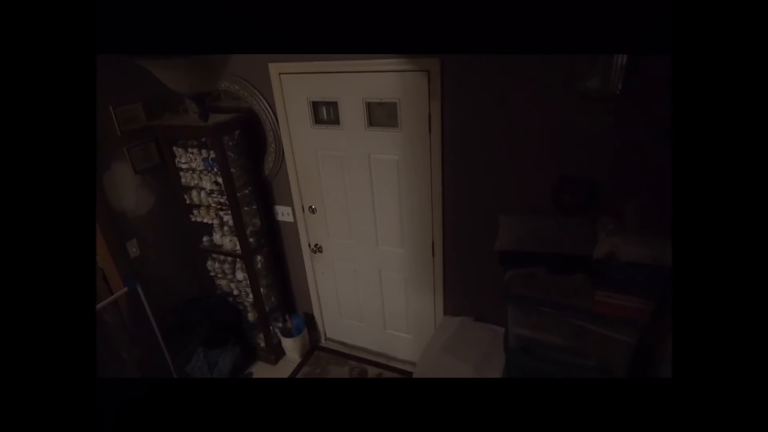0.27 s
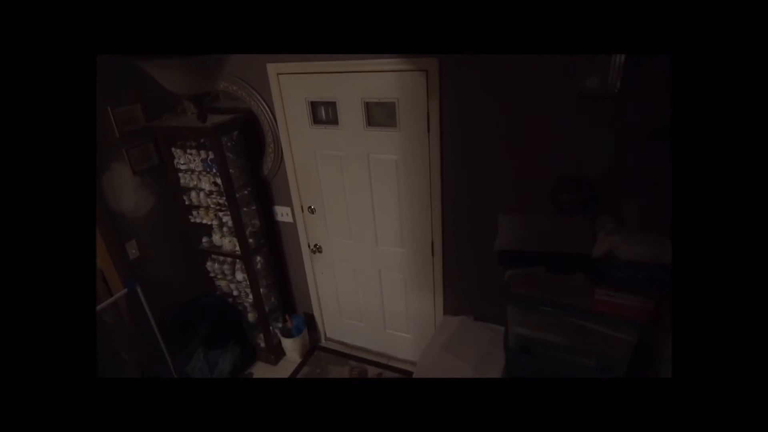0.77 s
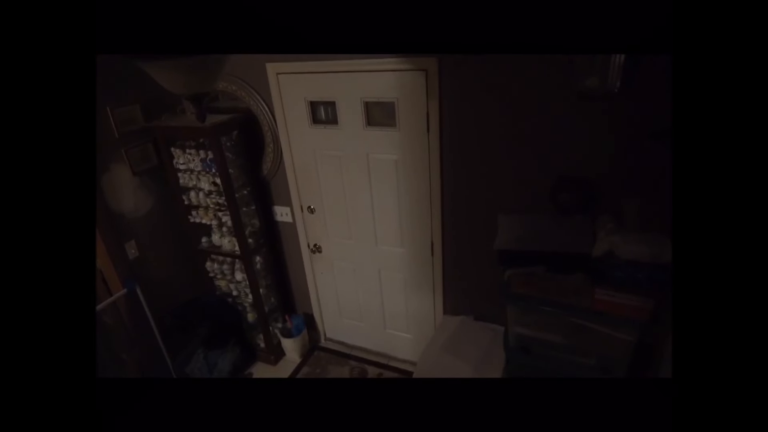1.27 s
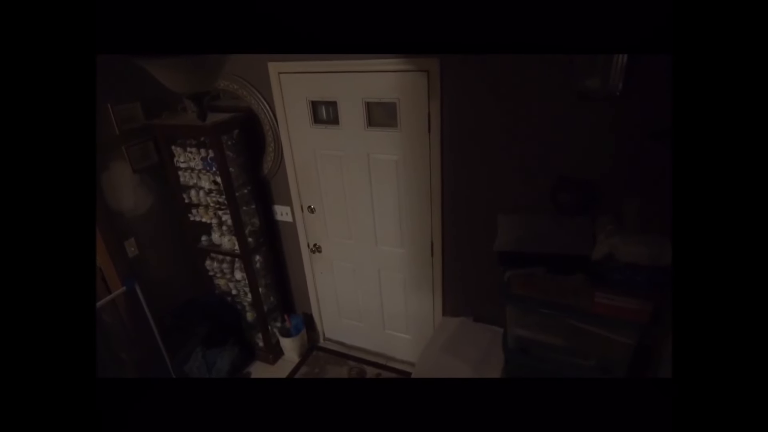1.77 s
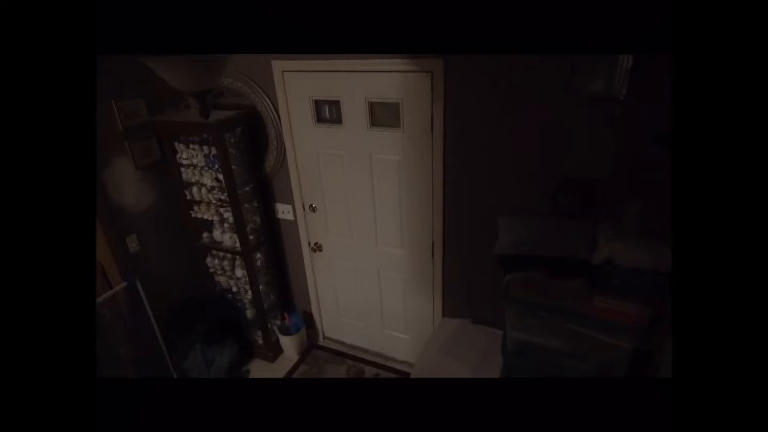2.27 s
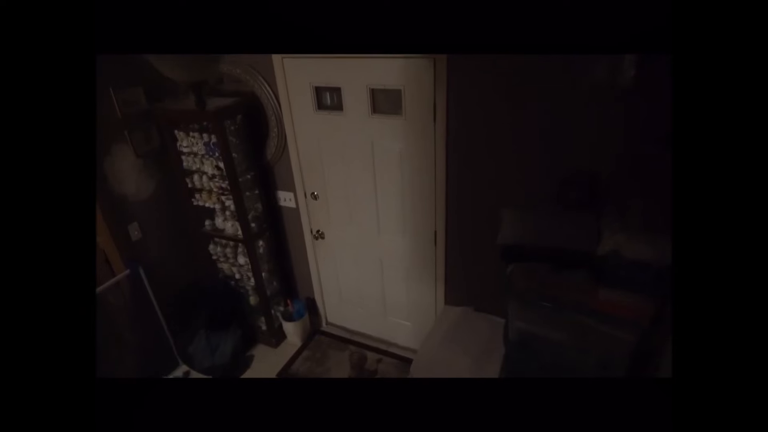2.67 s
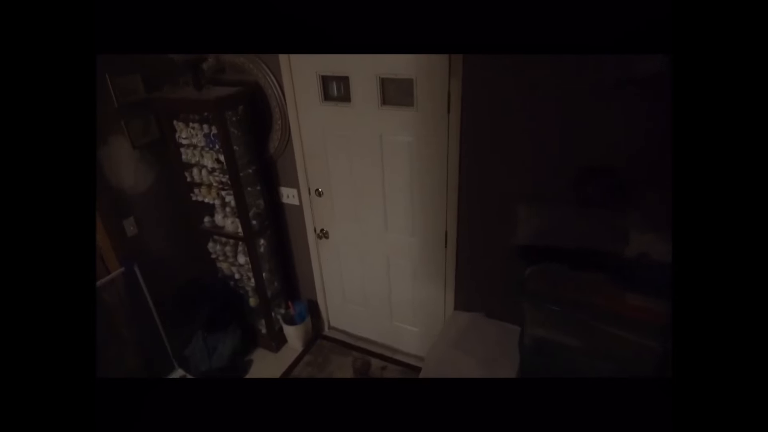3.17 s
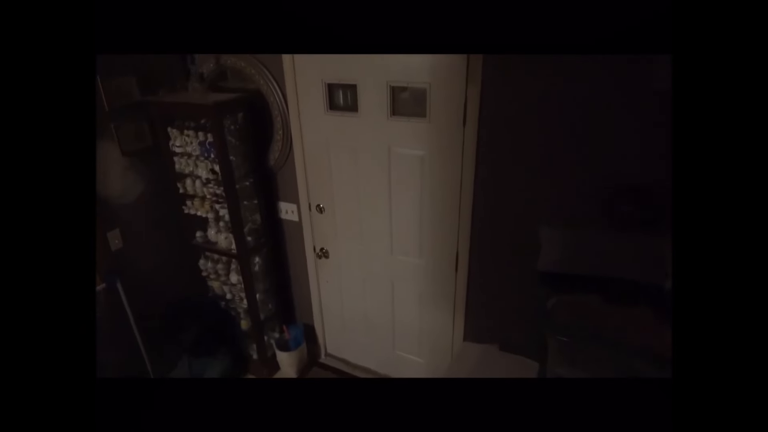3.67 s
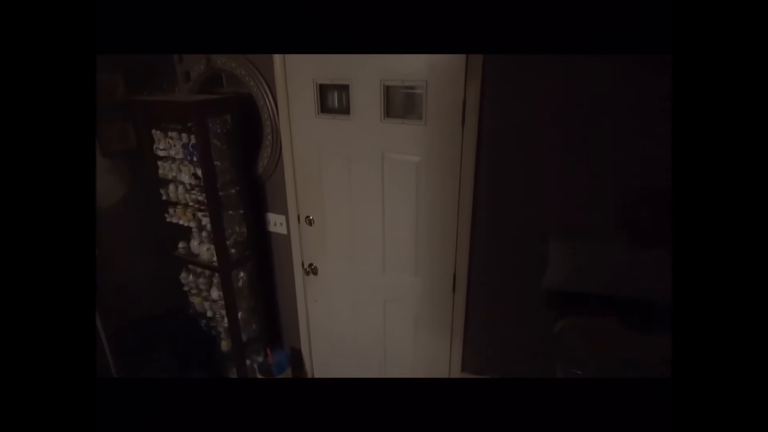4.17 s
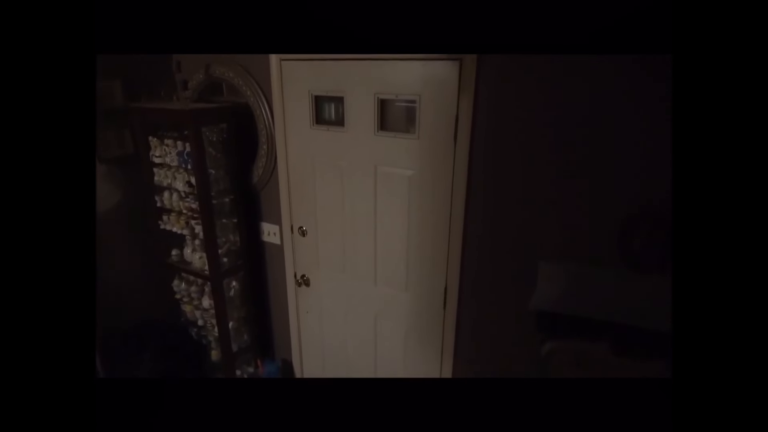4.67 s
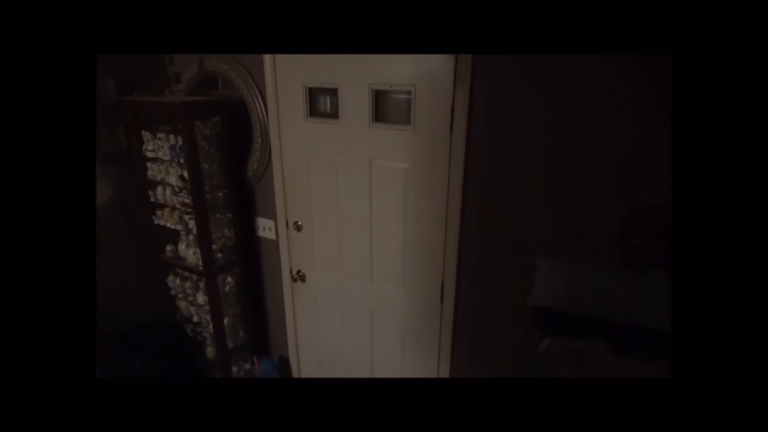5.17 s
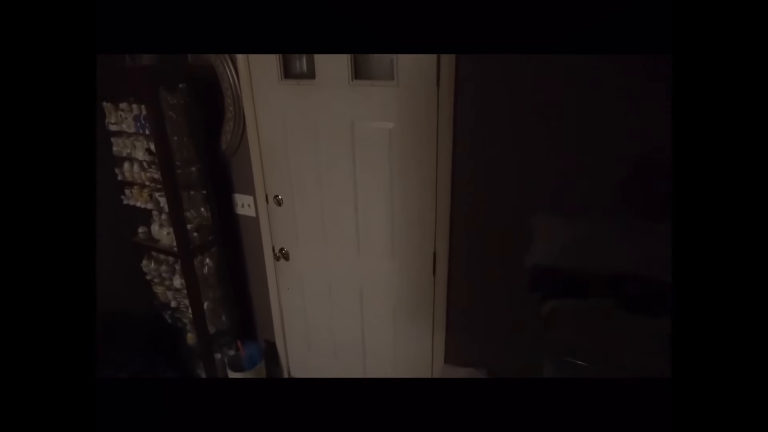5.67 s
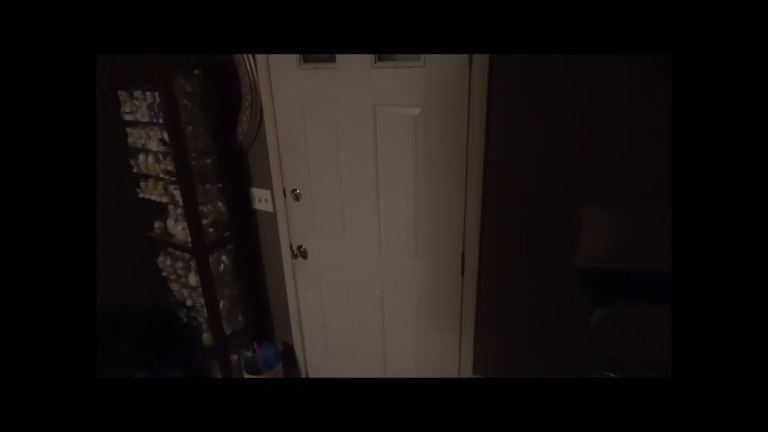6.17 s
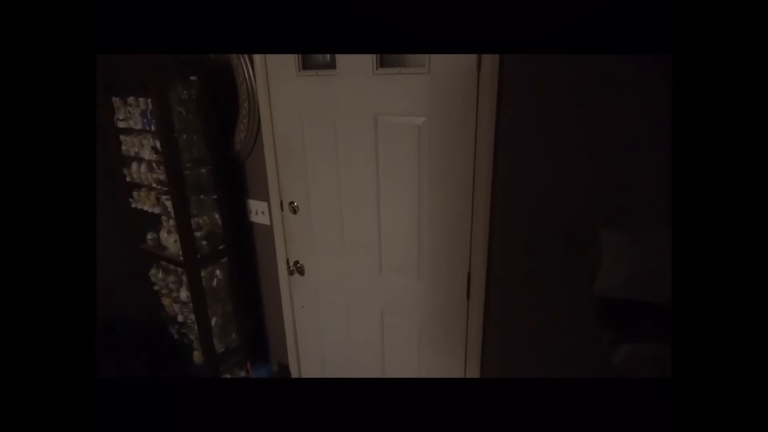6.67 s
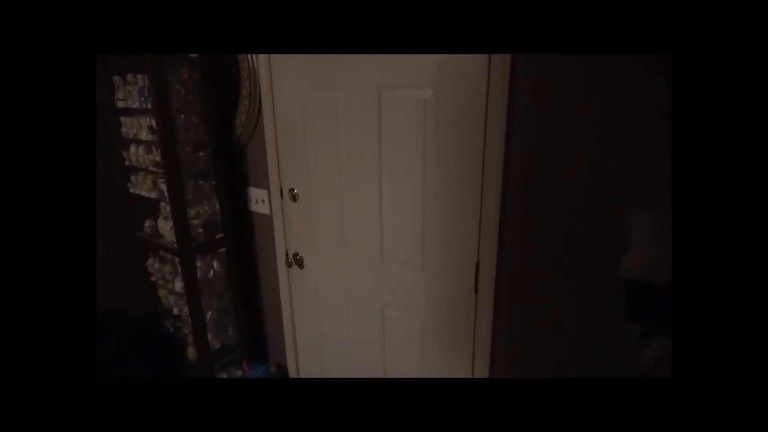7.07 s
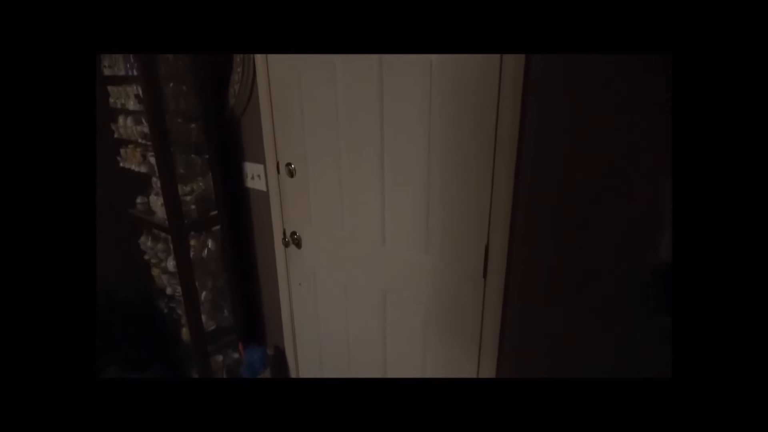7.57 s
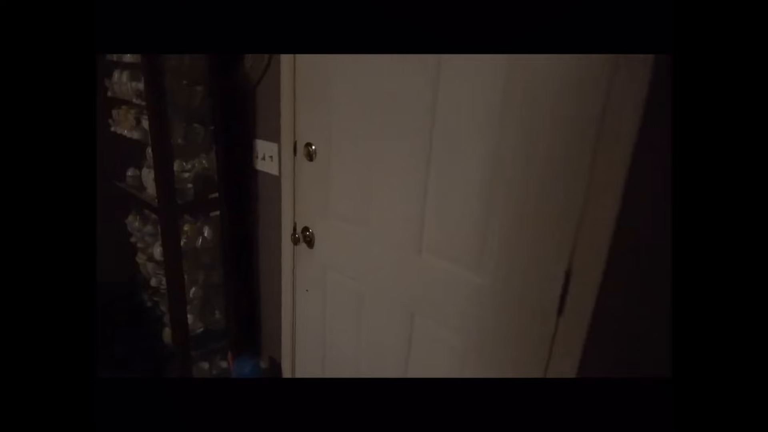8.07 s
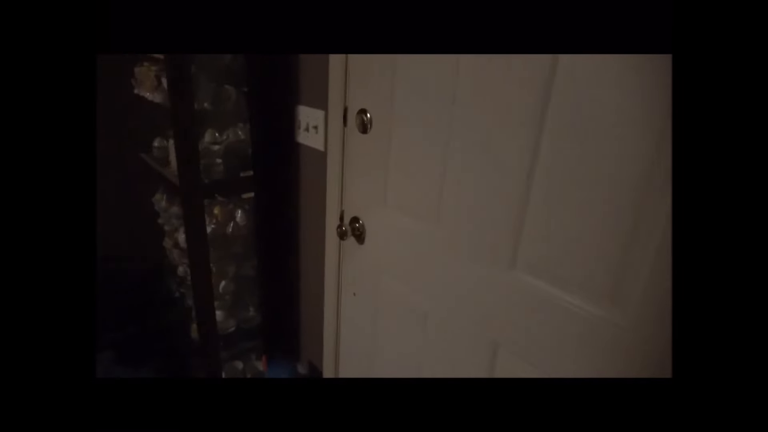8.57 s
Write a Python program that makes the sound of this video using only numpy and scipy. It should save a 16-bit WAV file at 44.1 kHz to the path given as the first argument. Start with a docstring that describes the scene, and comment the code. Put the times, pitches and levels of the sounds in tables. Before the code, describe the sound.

Knuckles knock on a panelled front door in sets of three, booming through a quiet hallway with faint fan hum and small indoor movements.

```python
"""Knuckles rap on a panelled front door, heard from the hallway: three sets of three knocks, then one more.
Each knock is a noise clack, dense panel ring and sine modes that swell into a low boom; force adds treble.
Behind it the house hums faintly: coloured noise with duct resonances and narrow, wavering fan lines.
Someone indoors starts to walk: rustling noise with swishes, small ringing clicks, two soft footfalls
and one faint shoe squeak."""
import sys
import numpy as np
from scipy import signal
from scipy.fft import rfft, irfft, next_fast_len
from scipy.io import wavfile
from scipy.ndimage import uniform_filter1d

SR = 44100
rng = np.random.default_rng(int(sys.argv[2]) if len(sys.argv) > 2 else 0)


def file_out(sig):
    """Save sig as 16-bit WAV at sys.argv[1]."""
    # one column per channel
    cols = np.atleast_2d(sig).T
    # limit, then scale
    lim = np.clip(cols, -1, 1)
    pcm = np.round(lim * 32767).astype(np.int16)
    wavfile.write(sys.argv[1], SR, pcm)


N = 388521  # samples

# Left-right correlation of the knocks and footfalls. Each row: frequency in Hz, correlation 0-1.
KNOCK_LIKENESS = [(80, 1), (150, 0.7), (280, 0.77), (550, 0.97), (1200, 0.9), (2200, 1), (7000, 0.76),
                  (15000, 0.52)]
# Left-right correlation of background, clothing, clicks and squeak. Each row: frequency in Hz, correlation 0-1.
NEAR_LIKENESS = [(25, 1), (100, 0.95), (600, 0.87), (1500, 0.93), (3000, 1), (7000, 0.68), (15000, 0.18)]


def amp(db):
    """Decibels to amplitude gain."""
    return 10 ** (np.asarray(db) / 20)


def unit(x):
    """Scale to rms 1."""
    return x / np.sqrt(np.mean(x ** 2) + 1e-20)


def along(points, hz):
    """Interpolate (Hz, value) points on a log frequency axis."""
    f, v = np.transpose(points)
    return np.interp(np.log(hz + 1), np.log(f + 1), v)


def filtered(x, response):
    """Multiply the spectrum of x by response(hz), zero-padded by at least 0.25 s."""
    n = x.shape[-1]
    m = next_fast_len(n + SR // 4)
    return irfft(rfft(x, m) * response(np.fft.rfftfreq(m, 1 / SR)), m)[..., :n]


def noise(colour_db, size, likeness=NEAR_LIKENESS):
    """Stereo noise of rms 1; mid and side shares set the left-right correlation per frequency."""
    def mid_side_gain(hz):
        angle = np.arccos(np.clip(along(likeness, hz), 0, .995)) / 2
        return amp(colour_db(hz)) * [np.cos(angle), np.sin(angle)]

    mid, side = filtered(rng.standard_normal((2, size)), mid_side_gain)
    return unit(np.array([mid + side, mid - side]))


def fade(t, t60):
    """Exponential decay by 60 dB in t60 seconds."""
    return np.exp(-np.log(1000) * t / t60)


def burst(spectrum, rise, t60, likeness=KNOCK_LIKENESS):
    """One second of coloured noise with exponential rise and decay, times in seconds."""
    t = np.arange(SR) / SR
    envelope = (1 - np.exp(-t / rise)) * fade(t, t60)
    return noise(lambda hz: along(spectrum, hz), SR, likeness) * envelope


def hump(s, length):
    """Gaussian swell of height 1 at time s, length seconds wide at half height."""
    return .5 ** ((2 * (np.arange(N) / SR - s) / length) ** 2)


def add(track, s, sound):
    """Mix a sound into the track at time s."""
    part = track[:, round(s * SR):][:, :sound.shape[-1]]
    part += sound[..., :part.shape[-1]]


def resonances_db(rows, hz):
    """Summed resonance peaks; each row: centre in Hz, width in Hz at -6 dB, peak in dB."""
    power = sum(amp(db) ** 2 / (1 + (2 * (hz - f) / width) ** 2) ** 2 for f, width, db in rows)
    return 10 * np.log10(power)


def house(line_width_hz=4):
    """Room tone with a distant fan: broad rush, air-stream resonances and narrow noise lines that waver."""
    # Each row: frequency in Hz, relative density in dB per Hz.
    rush_tone = [(15, -45), (25, -13.5), (59, -3.5), (122, -8.5), (188, -10.5), (246, -4), (267, -6.5),
                 (469, -3), (648, -9.5), (703, -3), (1080, -12.5), (1240, -13), (1530, -15), (6550, -33),
                 (15500, -31)]
    rush_treble = [(1500, 5.5), (5000, 0.5), (12000, -8)]  # added to rush_tone: Hz, dB
    # Air stream of the fan. Each row: centre in Hz, width in Hz, relative level in dB.
    duct_rows = [(132, 78, 9), (460, 20, -1), (635, 51, -2), (1267, 105, 2)]
    # Fan lines. Each row: frequency in Hz, relative level in dB.
    fan_lines = [(86.1, -64.5), (118.4, -60.5), (242.2, -64.5), (479.1, -64.5), (597.5, -63.5),
                 (694.4, -62), (1270, -99)]
    # Level ahead of the three mix gains. Each row: time in seconds, level in dB.
    house_level = [(0, -53.5), (1.0, -52), (4.8, -49.5), (8.8, -50)]

    line_rows = [(f, line_width_hz, db) for f, db in fan_lines]
    rush = noise(lambda hz: along(rush_tone, hz) + along(rush_treble, hz), N)
    duct = noise(lambda hz: resonances_db(duct_rows, hz), N)
    hum = noise(lambda hz: resonances_db(line_rows, hz), N)
    s, level_db = np.transpose(house_level)
    level = amp(np.interp(np.arange(N) / SR, s, level_db))
    return level * (amp(-0.5) * rush + amp(-5.5) * duct + amp(-4) * hum)


def clothes():
    """Fabric friction as noise: a steady rustle grows with the walk, and each movement adds power."""
    # Each row: frequency in Hz, relative density in dB per Hz.
    rustle_tone = [(600, -1), (2000, 0), (4000, 0), (7000, -4), (11000, -7.5), (15000, -11)]
    # One swish per movement. Each row: centre in seconds, level in dB.
    swishes = [(2.83, -63.5), (3.32, -61.5), (5.12, -63), (5.66, -61), (5.9, -60.5), (7.0, -63),
               (7.96, -64.5), (8.42, -65)]
    swish_s = 0.27  # width at half amplitude
    still_db, walk_db = -68.5, -64.5
    walk_start_s, walk_rise_s = 2.2, .25

    walking = (1 + np.tanh((np.arange(N) / SR - walk_start_s) / walk_rise_s)) / 2
    steady = amp(still_db + (walk_db - still_db) * walking)
    power = steady ** 2 + sum((amp(db) * hump(s, swish_s)) ** 2 for s, db in swishes)
    return np.sqrt(power) * noise(lambda hz: along(rustle_tone, hz), N)


def footfalls():
    """Soft feet on the hall floor: mostly low noise bursts."""
    # Each row: start in seconds, level in dB ahead of the burst envelope.
    steps = [(3.19, -51.5), (7.82, -50)]
    # Each row: frequency in Hz, relative density in dB per Hz.
    step_tone = [(25, -12), (65, 3), (130, -6), (500, 0), (1200, -10), (3000, -22)]
    out = np.zeros((2, N))
    for s, db in steps:
        add(out, s, amp(db) * burst(step_tone, rise=0.008, t60=0.39))
    return out


def shoe_squeak():
    """A shoe squeaks once, faintly: a swell of narrow-band noise."""
    # Each row: frequency in Hz, relative density in dB per Hz.
    squeak_tone = [(2400, -14), (3200, -17), (3480, -6), (3750, -18), (5000, -35)]
    centre_s, length_s, level_db = 7.83, 0.18, -59
    return amp(level_db) * hump(centre_s, length_s) * noise(lambda hz: along(squeak_tone, hz), N)


def clicks():
    """Small nearby clicks: a noise burst plus a sine ring that share one rise time."""
    # Each row: start in seconds, level in dB ahead of the envelopes, t60 in seconds,
    # treble tilt in dB per octave, ring frequency in Hz.
    click_rows = [(2.397, -45, 0.19, -4, 1254), (2.863, -54, .11, -1.5, 2870), (3.2853, -35, 0.02, -2, 880),
                  (4.392, -35, 0.24, 1, 2560), (4.404, -36.5, 0.089, 2.5, 3100),
                  (5.876, -43.5, 0.046, -3, 1740), (7.593, -40.5, 0.17, -2, 1160),
                  (7.62, -42.5, 0.15, -2, 2040)]
    # Ahead of the tilt. Each row: frequency in Hz, relative density in dB per Hz.
    click_tone = [(200, -1), (600, 4), (1000, 3.5), (1900, -2.5), (2900, -1.5), (3700, -3), (6500, -6),
                  (10000, -12.5), (15000, -26)]
    rise_per_t60 = 0.019
    ring_db, ring_t60_max_s = 1, 0.072  # ring level is relative to the noise burst

    out, t = np.zeros((2, N)), np.arange(SR) / SR
    for s, db, t60, tilt_db, ring_hz in click_rows:
        rise = rise_per_t60 * t60
        tone = [(hz, level + tilt_db * np.log2(hz)) for hz, level in click_tone]
        tick = burst(tone, rise, t60, NEAR_LIKENESS)
        envelope = (1 - np.exp(-t / rise)) * fade(t, min(t60, ring_t60_max_s))
        ring = np.sin(2 * np.pi * ring_hz * t) * envelope
        add(out, s, amp(db) * (tick + amp(ring_db) * ring))
    return out


def dense_ring(hold_s):
    """Countless panel modes and wall echoes as noise: each band swells, holds, then dies at its own rate."""
    # Each row: frequency in Hz, relative density in dB per Hz.
    wood_tone = [(55, -21), (90, 5), (300, -1), (430, -0.5), (600, -0.5), (740, -2.5), (950, -6),
                 (1180, -1.5), (1500, -7), (1800, -11), (2300, -24), (4000, -31.5), (7000, -38),
                 (15000, -52.5)]
    # Swell time constant. Each row: frequency in Hz, time in seconds.
    swell_times = [(100, 0.005), (330, 0.0023), (560, 0.015), (800, 0.012), (1200, 0.0034), (2500, 0.018),
                   (6000, 0.014)]
    # Decay after the hold. Each row: frequency in Hz, t60 in seconds.
    ring_times = [(100, 0.4), (400, 0.19), (1200, 0.32), (2500, 0.23), (6000, 0.3), (14000, 0.29)]

    wood = noise(lambda hz: along(wood_tone, hz), SR, KNOCK_LIKENESS)
    hz, t, z = signal.stft(wood, SR, nperseg=256)
    swell = 1 - np.exp(-t / along(swell_times, hz)[:, None])
    decay = fade(np.maximum(t - hold_s, 0), along(ring_times, hz)[:, None])
    return signal.istft(z * swell * decay, SR, nperseg=256)[1][:, :SR]


def clear_modes(scatter_db):
    """Strong door and hallway modes as sines; the higher, the more their level depends on the spot hit."""
    # Each row: frequency in Hz, relative level in dB, t60 in seconds, swell time in seconds.
    modes = [(32, -42, .8, .03), (77, -22, .27, .025), (85, -21, .36, .025), (124.5, -17.7, .53, .05),
             (143, -16, .22, .04), (153.3, -14, .4, .06), (210, -20, .23, .02), (224, -26, .22, .015),
             (240.5, -27, .42, .02), (257, -19, .22, .02), (312, -28, .25, .008), (336, -28, .25, .008),
             (355, -26, .25, .008), (405, -36, .25, .008), (522, -26, .25, .03), (546, -27, .25, .03),
             (597, -25, .25, .03), (677, -27, .26, .025), (809, -33, .28, .008), (863, -34, .3, .008),
             (973, -31, .22, .003), (1063, -29, .24, .003), (1082, -29, .26, .003), (1134, -30, .36, .003),
             (1168, -32, .36, .003), (1208, -29, .26, .003), (1256, -28, .28, .003), (1353, -31, .26, .003)]
    t = np.arange(SR) / SR
    hz, db, t60, swell = np.transpose(modes)[:, :, None]
    luck_db = scatter_db * np.sqrt(hz / hz.max()) * rng.standard_normal(hz.shape)
    sign = (-1) ** np.arange(len(hz))[:, None]
    envelope = fade(t, t60) * (1 - np.exp(-(t / swell) ** 2))
    return np.sum(amp(db + luck_db) * sign * np.sin(2 * np.pi * hz * t) * envelope, axis=0)


def struck_wood():
    """Dense ring plus the short noise of knuckles on wood."""
    # Knuckle contact. Each row: frequency in Hz, relative density in dB per Hz.
    contact_tone = [(60, -1), (180, 3.5), (350, 0.5), (560, -12.5), (850, -3.5), (1150, 9), (1450, 5),
                    (2000, -10), (3000, -22.5), (7000, -35), (15000, -45.5)]
    contact = burst(contact_tone, rise=0.0016, t60=0.15)
    return amp(-18.5) * dense_ring(hold_s=0.031) + amp(-14.0) * contact


def knocks():
    """Door blows share most of one noise answer; fresh noise and mode levels vary, more so in the treble."""
    # Each row: knuckle landing in seconds, then dB offsets for force, hollow panel tone,
    # knuckle clack, graze and latch rattle.
    knock_rows = [(1.0461, 1, 0.5, -1.5, 5, -10), (1.4759, -1.8, 1, -4, -1, -3.5),
                  (1.9381, 1, 1.5, -2, 7.5, -14), (3.5625, -0.2, -1.5, -2, 4.5, -17),
                  (4.045, 0, -1.5, -2, 3, -11), (4.4927, 1.5, 3, 0.5, 7, -2.5),
                  (6.1650, 1.5, -1, -1, 9, -2), (6.5782, 2.5, -3.5, -6, 2, -4),
                  (7.0365, 4.5, -2.5, 1, 5.5, 3), (8.5958, 5.5, 2, -1.5, 0, 3)]
    # Share of struck-wood power new at each knock. Each row: frequency in Hz, share 0-1.
    fresh_share = [(200, .1), (600, .2), (1300, .35), (4000, .8)]
    # Hand brushing the door. Each row: frequency in Hz, relative density in dB per Hz.
    graze_tone = [(40, -24), (80, -15), (250, 16), (550, -22), (1150, 5), (1600, -8), (2400, -15.5),
                  (12000, -46)]
    # Door against its latch. Each row: frequency in Hz, relative density in dB per Hz.
    latch_tone = [(600, -16), (1500, 10.5), (3000, -8.5), (7000, -10.5), (15000, -29)]
    # Stereo balance. Each row: frequency in Hz, left minus right in dB.
    balance = [(50, -6), (110, 4.5), (200, 2), (380, 6.5), (700, -0.5), (1300, 1), (2400, -0.5),
               (12000, 1.5)]
    crack_db, crack_db_per_force_db = -1.07, 1.4
    graze_lead_s, graze_base_db = .009, -28
    rebound_s, latch_base_db = .022, -24.5

    out = np.zeros((2, N))
    usual = filtered(struck_wood(), lambda hz: np.sqrt(1 - along(fresh_share, hz)))
    for s, force_db, hollow_db, clack_db, graze_db, rattle_db in knock_rows:
        fresh = filtered(struck_wood(), lambda hz: np.sqrt(along(fresh_share, hz)))
        blow = usual + fresh + amp(1.0) * clear_modes(scatter_db=4.5)
        # boom follows force, crack grows faster; a thin panel sounds hollow and bites near 2 kHz
        touch = [(420, force_db), (540, hollow_db), (850, hollow_db), (1150, clack_db), (1450, clack_db),
                 (2000, hollow_db), (4000, crack_db + crack_db_per_force_db * force_db)]
        add(out, s, filtered(blow, lambda hz: amp(along(touch, hz))))
        # the hand grazes the door before the knuckles land
        graze = burst(graze_tone, rise=0.0034, t60=0.062)
        add(out, s - graze_lead_s, amp(graze_base_db + graze_db) * graze)
        # the door springs back against its latch
        rattle = burst(latch_tone, rise=0.00091, t60=0.093)
        add(out, s + rebound_s, amp(latch_base_db + rattle_db) * rattle)
    return filtered(out, lambda hz: amp(np.outer([.5, -.5], along(balance, hz))))


def scene():
    """Everything heard in the hallway."""
    walker = clothes() + footfalls() + shoe_squeak() + clicks()
    return house() + walker + knocks()


def limited(x, ceiling_db, window_s):
    """Fast soft limiter: gain falls as the short-term rms nears and passes the ceiling."""
    size = max(int(window_s * SR), 2)
    level = np.sqrt(np.abs(uniform_filter1d(np.mean(x ** 2, axis=0), size)))
    gain = (1 + (level / amp(ceiling_db)) ** 4) ** (-1 / 4)
    return x * uniform_filter1d(gain, size)


def record(dry):
    """Limit the loud knocks, then cut everything from top_hz up."""
    top_hz = 15400
    return filtered(limited(dry, ceiling_db=-20.5, window_s=0.0097), lambda hz: hz < top_hz)


dry = scene()
out = record(dry)
file_out(out)
```